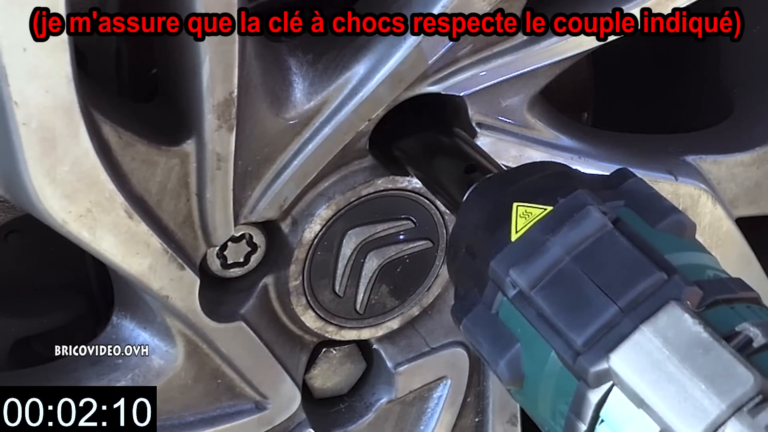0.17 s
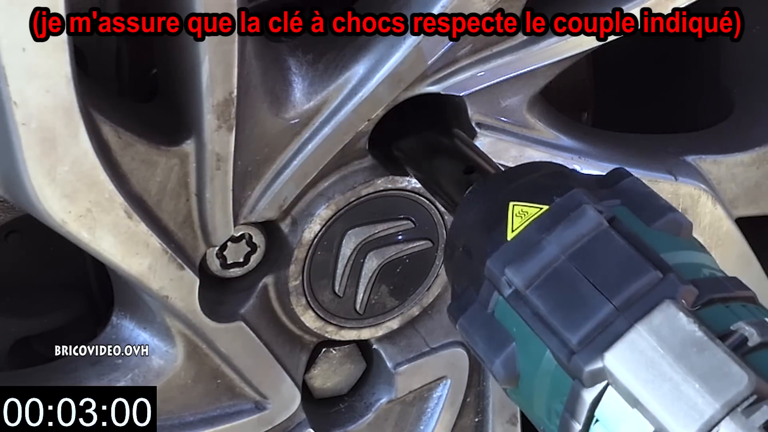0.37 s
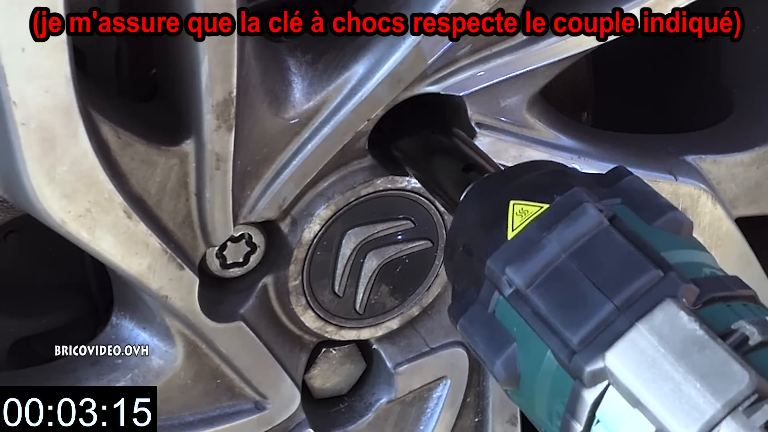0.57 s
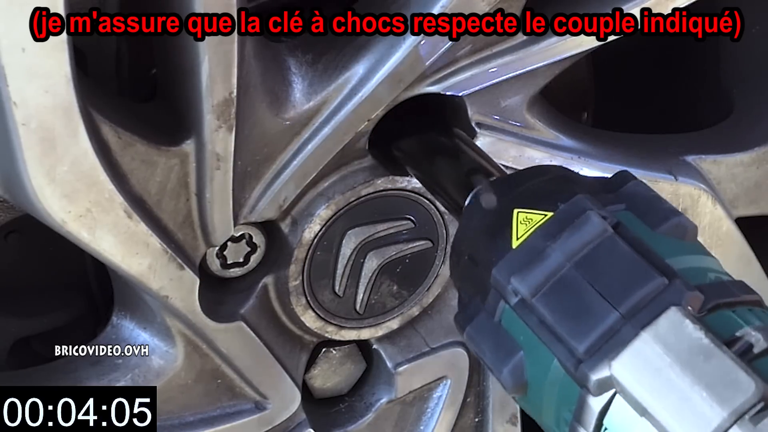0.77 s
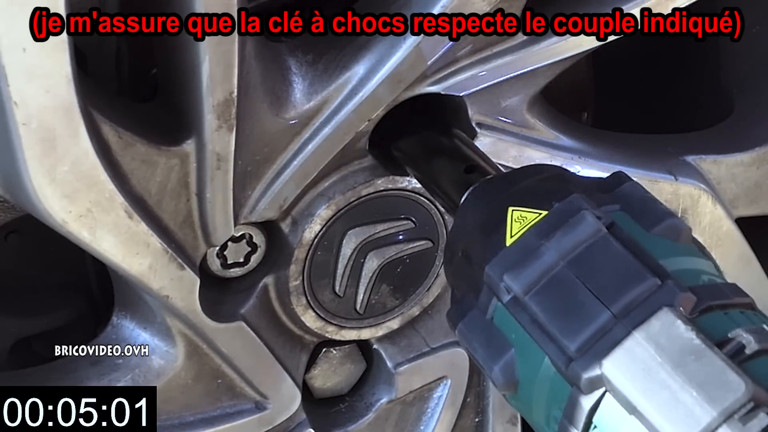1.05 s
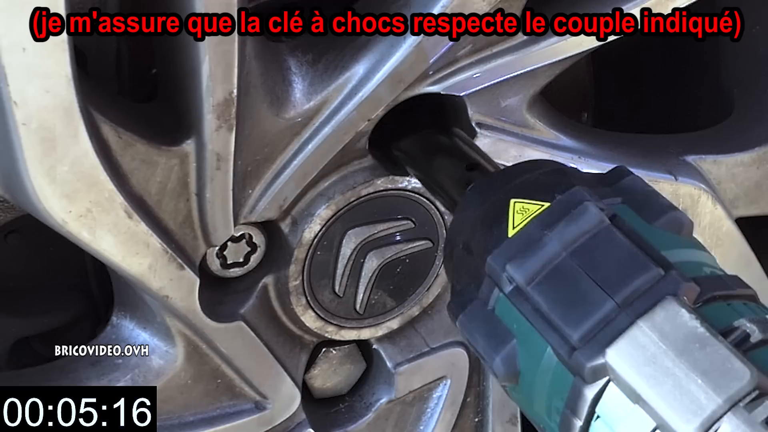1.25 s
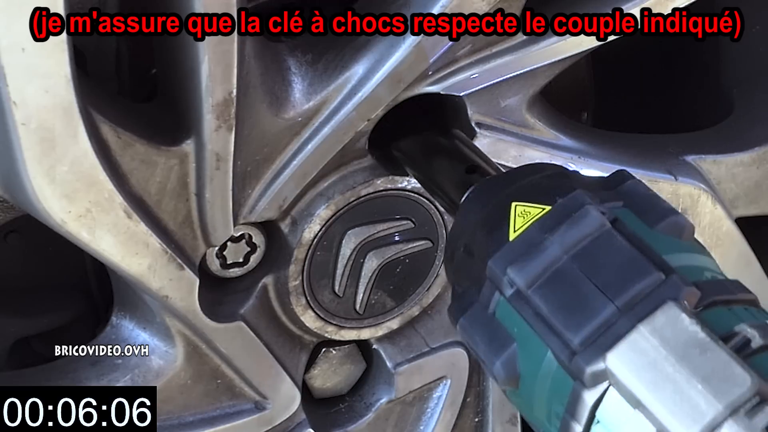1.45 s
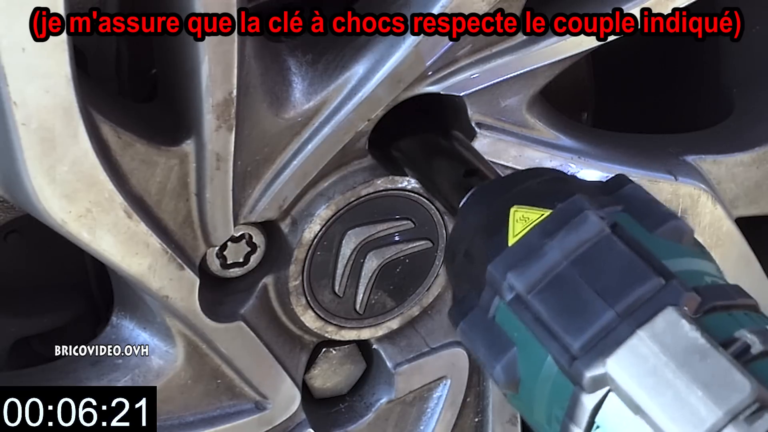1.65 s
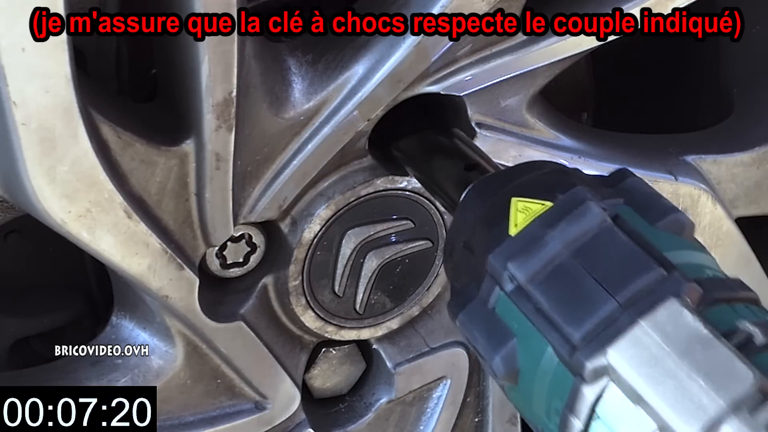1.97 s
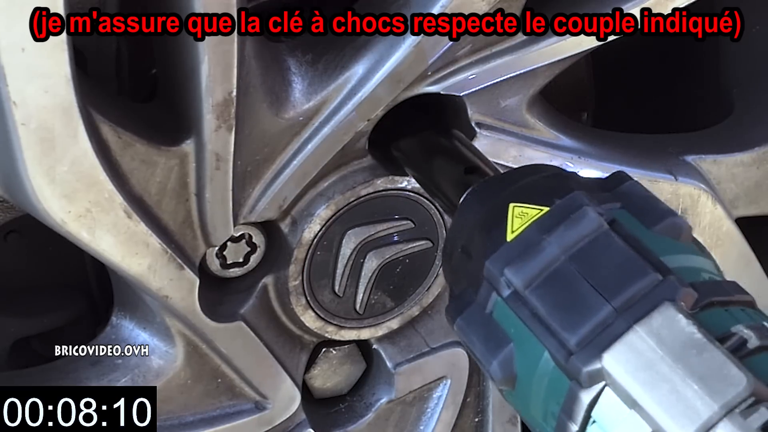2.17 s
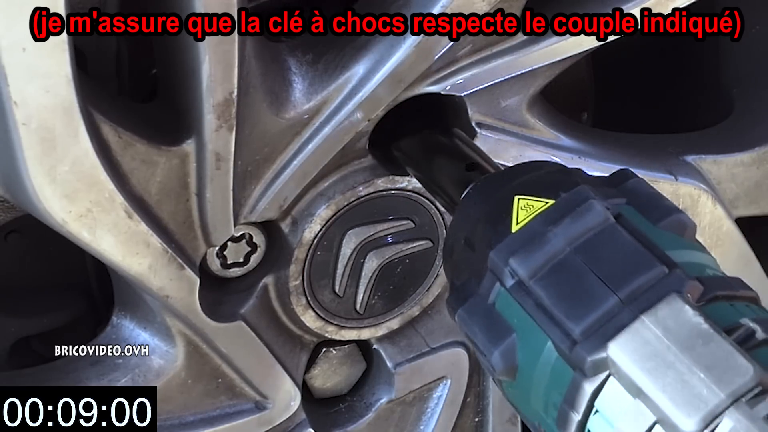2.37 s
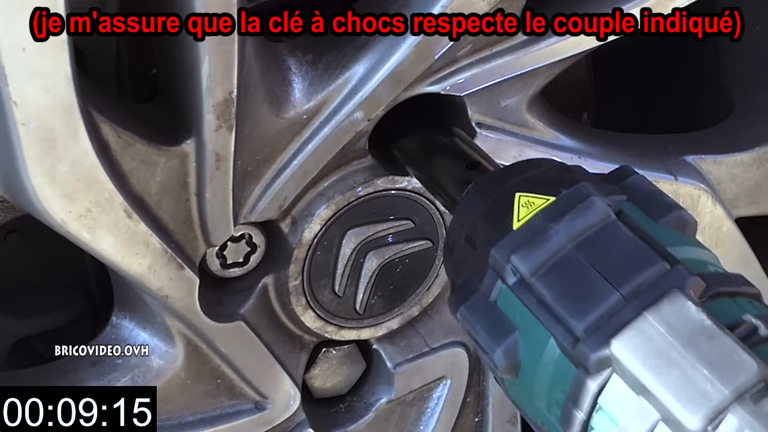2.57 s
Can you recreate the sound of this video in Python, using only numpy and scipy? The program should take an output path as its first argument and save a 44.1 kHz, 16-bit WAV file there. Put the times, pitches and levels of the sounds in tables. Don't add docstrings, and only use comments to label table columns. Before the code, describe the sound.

A cordless impact wrench hammers a wheel nut from 0 to about 2.6 seconds, already at full speed and never stopping. Roughly sixty blow cycles a second fuse into a harsh, buzzing steel clatter with uneven sharp cracks, casing rattle and motor hiss. Loudest in the first half second, it eases by a few decibels after 0.9. Close, dry, outdoors; faint low wind gusts after 1.7.

```python
import sys
import numpy as np
from scipy import signal
from scipy.fft import rfft, irfft, next_fast_len
from scipy.io import wavfile
from scipy.ndimage import uniform_filter1d, map_coordinates

SR = 44100
rng = np.random.default_rng(int(sys.argv[2]) if len(sys.argv) > 2 else 0)


def store_wav(level_fs):
    pcm = np.round(np.clip(np.atleast_2d(level_fs), -1, 1) * 32767)
    wavfile.write(sys.argv[1], SR, pcm.T.astype(np.int16))


def makeup_ratio(level_db):
    decades = np.asarray(level_db, float) / 20
    return 10 ** decades


N = 119070

CRACK_AT_S = 0.00027
# (time [s], level [dB])
EFFORT = [(0, -26), (.2, -25.5), (.55, -26.5), (.9, -28.5), (1.3, -29), (1.65, -29), (2.05, -29.5),
          (2.3, -30), (2.6, -29)]
# (frequency [Hz], density [dB per Hz])
WHEEL_SCATTER = [(880, -17), (1500, -11.5), (2930, -6), (7260, -1.5), (9100, -0.5), (14200, -1.5),
                 (15800, -11)]


def unit(x):
    return x / np.sqrt(np.mean(x ** 2) + 1e-20)


def along(points, hz):
    f, v = np.transpose(points)
    return np.interp(np.log(hz + 1), np.log(f + 1), v)


def curve(rows):
    return np.interp(np.arange(N) / SR, *np.transpose(rows))


def filtered(x, response):
    m = next_fast_len(N + 8192)
    return irfft(rfft(x, m) * response(np.fft.rfftfreq(m, 1 / SR)), m)[..., :N]


def peak(f, hz, width):
    return 1j * f * width / (hz * hz - f * f + 1j * f * width)


def placed(times, rows):
    at = np.round(times * SR).astype(int)[:, None] + np.arange(rows.shape[1])
    inside = (at >= 0) & (at < N)
    return np.bincount(at[inside], rows[inside], N)


def pair(spectrum, alike):
    def mid_and_side(hz):
        turn = np.arccos(np.clip(along(alike, hz), -1, 1)) / 2
        return makeup_ratio(along(spectrum, hz)) * [np.cos(turn), np.sin(turn)]

    mid, side = filtered(rng.standard_normal((2, N)), mid_and_side)
    return unit(np.array([mid + side, mid - side]))


def lumps(depth_db):
    return depth_db * map_coordinates(rng.standard_normal(200), [np.arange(N) * 52 / SR])


def cycles():
    # (time [s], delay [ms])
    motor_lag = [(0.015, 15.49), (0.173, 16.51), (0.329, 16.41), (0.488, 18.61), (0.645, 19.51),
                 (0.802, 19.91), (0.958, 19.81), (1.115, 19.62), (1.27, 18.55), (1.425, 17.57),
                 (1.582, 17.68), (1.738, 17.69), (1.894, 17.19), (2.05, 16.43), (2.207, 16.93),
                 (2.362, 16.21), (2.518, 15.32), (2.673, 14.21)]
    blows_per_s = 61.3
    beat = np.arange(-2, 166) / blows_per_s
    s, ms = np.transpose(motor_lag)
    return beat + np.interp(beat + ms[0] / 1000, s, ms) / 1000


def contacts(starts):
    # (level [dB], time scatter [ms], level scatter [dB],
    # tail t60 [ms], casing rattle [dB])
    kinds = [(-7.5, 0.26, 0.5, 4.2, 20.5), (-5, .2, -1.2, 14.7, -12), (-11, .5, 6.5, 11, 3),
             (-0.5, 0.28, -1, 18, -14.5), (-13.5, 0.33, 2.5, 32, -50), (-6, .2, -1, 14.7, 8.5)]
    contact_ms = np.array([3.2, 5.15, 7.0, 8.5, 10.3, 13.2])
    # (time [s], level [dB], brightest frequency [Hz])
    hard_contacts = [(0.0081, -17.3, 5170), (0.0211, -17.2, 6370), (0.0243, -15.0, 11710),
                     (0.0374, -15.1, 15330), (0.0702, -17.5, 6030), (0.0903, -12.7, 8270),
                     (0.123, -16.5, 3620), (0.136, -17.5, 14990), (0.156, -17.4, 10510), (0.169, -14.4, 6370),
                     (0.221, -16.6, 10340), (0.2668, -16.1, 5860), (0.2702, -15.9, 10680),
                     (0.2864, -16.5, 8960), (0.2994, -17.4, 5510), (0.3193, -14.4, 10160),
                     (0.3519, -15.4, 8610), (0.3649, -16.1, 14990), (0.3682, -17.0, 11890),
                     (0.4148, -15.5, 11020), (0.4511, -15.0, 13780), (0.4674, -16.5, 13610),
                     (0.4839, -15.7, 10160), (0.4973, -17.8, 6200), (0.5007, -16.1, 9130),
                     (0.5173, -16.9, 10340), (0.5339, -17.8, 13610), (0.55, -17.7, 13440),
                     (0.563, -17.8, 6200), (0.5665, -15.9, 13610), (0.5827, -16.8, 13440),
                     (0.5992, -17.2, 10510), (0.6317, -15.5, 13780), (0.6447, -18.0, 9470),
                     (0.648, -17.2, 13260), (0.6646, -17.5, 13780), (0.6808, -17.1, 13260),
                     (0.6977, -16.8, 10680), (0.7305, -16.8, 13610), (0.7595, -16.8, 6720),
                     (0.7761, -18.2, 8270), (0.8115, -16.4, 13950), (0.8246, -17.8, 5860),
                     (0.8279, -14.6, 8440), (0.8447, -18.5, 3790), (0.8575, -18.5, 13610),
                     (0.8771, -19.0, 14470), (0.8903, -17.1, 14810), (0.8935, -17.2, 11890),
                     (0.9098, -15.5, 9650), (0.9423, -18.5, 9990), (0.9587, -19.3, 10850),
                     (0.9797, -19.3, 7750), (0.988, -19.6, 14990), (1.0072, -19.1, 8440),
                     (1.0234, -17.2, 13950), (1.04, -17.8, 13610), (1.1701, -18.8, 12920),
                     (1.191, -20.4, 8790), (1.199, -20.2, 9130),
                     (1.2188, -16.8, 9990), (1.2349, -19.4, 8440), (1.2673, -18.1, 8440),
                 (1.2965, -20.6, 14470), (1.3288, -20.0, 15330), (1.3482, -18.0, 13950),
                 (1.3938, -19.7, 12580), (1.462, -16.7, 9470), (1.492, -19.9, 15330), (1.4949, -18.7, 3620),
                 (1.5113, -19.7, 13090), (1.5322, -19.3, 8440), (1.5439, -18.7, 9130),
                 (1.5729, -18.5, 15160), (1.5924, -19.9, 13610), (1.6249, -18.1, 13440),
                 (1.6413, -18.9, 8440), (1.6581, -17.5, 13090), (1.6743, -18.7, 7920),
                 (1.6907, -19.1, 8270), (1.707, -17.8, 13610), (1.7231, -19.8, 9650), (1.7393, -17.2, 7580),
                 (1.7525, -20.6, 8270), (1.7884, -17.9, 13950), (1.8046, -19.5, 10160),
                 (1.837, -20.8, 8100), (1.8534, -17.8, 8270), (1.8826, -20.7, 5510), (1.8985, -18.9, 6550),
                 (1.9019, -19.1, 8100), (1.9343, -20.7, 3620), (1.9395, -21.0, 8270), (1.9716, -20.8, 9990),
                 (1.9994, -19.9, 8100), (2.053, -19.7, 12580), (2.0647, -16.2, 8100),
                 (2.0971, -17.5, 12580), (2.1132, -19.6, 8270), (2.1298, -16.2, 12400),
                 (2.1461, -19.8, 12920), (2.1626, -20.4, 12920), (2.1948, -19.4, 12060),
                 (2.2282, -16.7, 8790), (2.3418, -20.2, 13610), (2.3578, -21.0, 13090),
                 (2.3742, -16.8, 13780), (2.4389, -20.4, 15330), (2.4518, -19.1, 8610),
                 (2.455, -20.7, 12920), (2.471, -20.4, 12920), (2.4877, -19.0, 14300),
                 (2.5364, -19.8, 4310), (2.5378, -18.7, 13260), (2.5694, -20.7, 12400),
                 (2.6138, -17.9, 14300), (2.6466, -20.2, 14640), (2.6498, -19.7, 9820),
                 (2.6627, -20.6, 14470), (2.6786, -19.7, 7750)]
    hard_trim_db, usual_top_db, lug_db = -10, -3, 0.5
    shared = 0.4

    db, scatter_ms, scatter_db, t60_ms, rattle_db = np.transpose(kinds)
    chance = rng.standard_normal((2, len(starts), len(db)))
    times = starts[:, None] + (contact_ms + scatter_ms * chance[0]) / 1000
    gains = makeup_ratio(np.minimum(db + scatter_db * chance[1], usual_top_db))

    s, hard_db, hz = np.transpose(hard_contacts)
    due = (starts[:, None] + contact_ms / 1000).ravel() + CRACK_AT_S
    nearest = abs(s[:, None] - due).argmin(axis=1)
    hard = np.unravel_index(nearest, times.shape)
    strong = makeup_ratio(hard_db + hard_trim_db - np.interp(s, *np.transpose(EFFORT)))
    gains[hard] = strong

    spent = np.linalg.norm(gains, axis=1, keepdims=True) / np.linalg.norm(makeup_ratio(db))
    lug = (-1) ** np.arange(len(starts))[:, None]
    gains = gains / spent ** shared * makeup_ratio(lug_db * lug)
    pitch = np.zeros(times.shape)
    times[hard], gains[hard], pitch[hard] = s - CRACK_AT_S, strong, hz
    t60 = np.tile(t60_ms, len(starts)) / 1000
    shakes = gains * makeup_ratio(rattle_db)
    return times.ravel(), gains.ravel(), t60, shakes.ravel(), pitch.ravel()


def hammer(times, gains, t60, pitch):
    # (time [s], share lost [0-1])
    seated = [(0, 0.15), (1, 0.19), (1.5, 0.2), (2.1, 0.17), (2.7, 0.31)]
    crack_db, crack_t60_s, rise_s = 2, 0.0029, 0.000099
    hard_crack_db, crack_scatter_db = 4, 2.6
    colour_db, bright_db, bright_width_hz, lowest_ring_hz = 2, 6, 840, 5000
    even = 0.7
    onset_samples = 53
    scatter_db, scatter_tail_db, scatter_t60_s = -11, -14, 0.016
    t, hz = np.arange(1024) / SR, np.fft.rfftfreq(1024, 1 / SR)
    is_hard = pitch[:, None] > 0

    snap_db = np.where(is_hard, hard_crack_db, crack_scatter_db * rng.standard_normal((len(times), 1)))
    steepness = np.where(t < CRACK_AT_S, 2, 1)
    crack = makeup_ratio(crack_db + snap_db - 60 * abs(t - CRACK_AT_S) / crack_t60_s * steepness)
    chatter = makeup_ratio(-60 * t / t60[:, None])
    shape = (crack + chatter) * (1 - np.exp(-t / rise_s))

    tint = uniform_filter1d(rng.standard_normal((len(times), 513)), size=50, axis=1)
    off_pitch = (hz - np.maximum(pitch, lowest_ring_hz)[:, None]) / bright_width_hz
    glint_db = bright_db * np.exp(-0.5 * off_pitch ** 2) * is_hard
    raw = rfft(shape * rng.standard_normal(shape.shape))
    evened = raw / uniform_filter1d(abs(raw), size=40, axis=1) ** even
    tone = evened * makeup_ratio(colour_db * unit(tint) + glint_db)

    heard = steel(hz) / np.sqrt(np.mean(abs(steel(hz)) ** 2))
    onset = irfft(tone * heard)[:, :onset_samples]
    burst = irfft(tone) / np.sqrt(np.mean(onset ** 2, axis=1, keepdims=True))
    mid = unit(filtered(placed(times, gains[:, None] * burst), steel))
    socket = filtered(mid, lambda f: peak(f, 5600, 1800))
    mid = mid - np.clip(curve(seated), 0, 1) * socket

    scatter_tail = makeup_ratio(scatter_tail_db - 60 * t / scatter_t60_s)
    wide = (shape + scatter_tail) * rng.standard_normal(shape.shape)
    side = unit(filtered(placed(times, gains[:, None] * wide), lambda f: makeup_ratio(along(WHEEL_SCATTER, f))))
    return mid, makeup_ratio(scatter_db) * side


def steel(f):
    # (frequency [Hz], width [Hz], level [dB])
    bands = [(2110, 750, -14.5), (2980, 214, -10), (3660, 53, -8.5), (3890, 160, -10), (5430, 1270, -4),
             (6610, 660, -2.5), (7900, 1070, -1.5), (9880, 1660, 0), (13850, 1960, -2.5)]
    ring = 0
    for k, (hz, width, db) in enumerate(bands):
        ring = ring + makeup_ratio(db) * peak(f, hz, width) * (-1) ** k
    return (1 - 0.64 * peak(f, 7450, 340)) * ring


def housing(starts):
    # (time into the cycle [ms], frequency [Hz], width [Hz], left level [dB], right level [dB])
    thuds = [(4.67, 328, 282, -57.5, -67.5), (12.26, 302, 180, -66, -76), (1.71, 560, 166, -60, -68.5),
             (2.124, 671, 156, -60, -63), (7.91, 860, 55, -63, -81), (2.13, 708, 30, -65.5, -70),
             (4.51, 245.3, 44, -67, -74.5)]
    lug_shares = [0.033, 0.45, 0.85, 0.29, 0, 0.52, 0]
    trends = [-0.5, -1, 2, -2, -2.5, 3, -1.5]
    scatter_ms, scatter_db = 0.1, 1.5
    out = np.zeros((2, N))
    lug = (-1.) ** np.arange(len(starts))[:, None]
    for (ms, hz, width, left_db, right_db), share, trend in zip(thuds, lug_shares, trends):
        chance = rng.standard_normal((len(starts), 2))
        times = starts + (ms + scatter_ms * chance[:, 0]) / 1000
        strength = makeup_ratio(scatter_db * chance[:, 1:] + trend * starts[:, None])
        push = placed(times, (1 - share + share * lug) * strength)
        thud = unit(filtered(push, lambda f: peak(f, hz, width) ** 3))
        out += makeup_ratio([[left_db], [right_db]]) * thud
    return out


def rattle(times, shakes):
    # (frequency [Hz], density [dB per Hz])
    casing = [(60, -16), (200, -11.5), (400, -7.5), (700, -5.5), (1100, -4.5), (1500, -12), (2500, -4),
              (4000, -6)]
    # (frequency [Hz], left-right likeness [-1 to 1])
    casing_alike = [(100, 0.39), (300, -0.39), (640, 0.12), (1400, 0.98)]
    level_db, t60_s, steady = -14, 0.036, 0.65
    t = np.arange(1500) / SR
    stir = unit(placed(times, shakes[:, None] * makeup_ratio(-60 * t / t60_s)))
    return makeup_ratio(level_db) * (stir + steady) * pair(casing, casing_alike) * makeup_ratio([[1.2], [-1.2]])


def fan():
    mid_db, side_db = -15.5, -16
    mid = unit(filtered(rng.standard_normal(N), steel))
    side = unit(filtered(rng.standard_normal(N), lambda hz: makeup_ratio(along(WHEEL_SCATTER, hz))))
    return makeup_ratio(mid_db) * mid, makeup_ratio(side_db) * side


def wind():
    # (time [s], level [dB])
    swell = [(0, -89), (1.0, -87.5), (1.68, -59), (1.78, -49), (1.91, -52), (1.98, -51), (2.02, -57),
             (2.06, -49), (2.15, -40.5), (2.2, -51), (2.27, -44), (2.3, -52), (2.35, -45.5), (2.41, -56),
             (2.49, -39), (2.54, -53), (2.7, -52)]
    # (frequency [Hz], density [dB per Hz])
    buffet = [(30, -12), (130, -11.5), (280, -2.5), (600, -2), (1000, -10), (2000, -24.5)]
    # (frequency [Hz], left-right likeness [-1 to 1])
    buffet_alike = [(60, -0.17), (150, -0.6), (300, -0.91)]
    return makeup_ratio(curve(swell) + lumps(3)) * pair(buffet, buffet_alike)


def rumble():
    # (frequency [Hz], density [dB per Hz])
    outdoors = [(25, -2), (100, -3), (200, -3.5), (500, -30), (1500, -27)]
    level_db, lumps_db = -76.5, 3.5
    noise = pair(outdoors, [(100, 0.05)])
    return makeup_ratio(level_db + lumps(lumps_db)) * noise * makeup_ratio([[1.1], [-1.1]])


def scene():
    # (frequency [Hz], left over right [dB])
    balance = [(1300, 2.5), (2400, -3.5), (4400, 1), (8100, -1), (15000, -.5)]
    starts = cycles()
    times, gains, t60, shakes, pitch = contacts(starts)
    mid, side = np.add(hammer(times, gains, t60, pitch), fan())
    halves = np.array([[0.5], [-0.5]])
    bright = filtered(np.array([mid + side, mid - side]), lambda hz: makeup_ratio(along(balance, hz) * halves))
    effort_db = curve(EFFORT)
    wrench = makeup_ratio(effort_db) * (bright + rattle(times, shakes))
    thuds = makeup_ratio(effort_db - effort_db.mean()) * housing(starts)
    return wrench + thuds + wind() + rumble()


def low_pass(x):
    return signal.sosfilt(signal.butter(12, 16320, fs=SR, output="sos"), x)


def record(dry):
    mix = filtered(dry, lambda hz: hz < 15830)
    return low_pass(mix)


dry = scene()
out = record(dry)
store_wav(out)
```